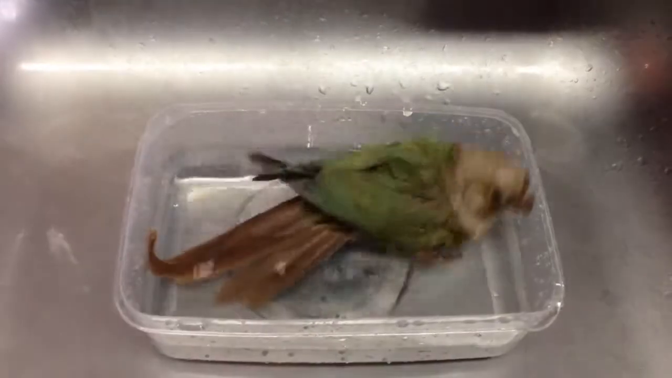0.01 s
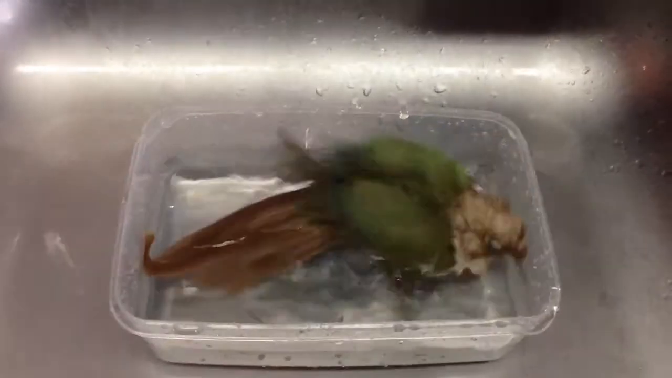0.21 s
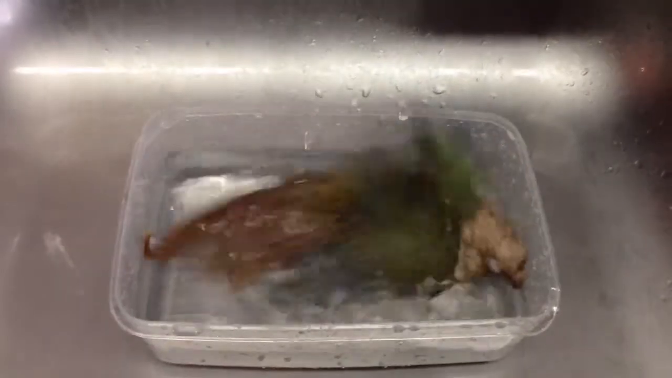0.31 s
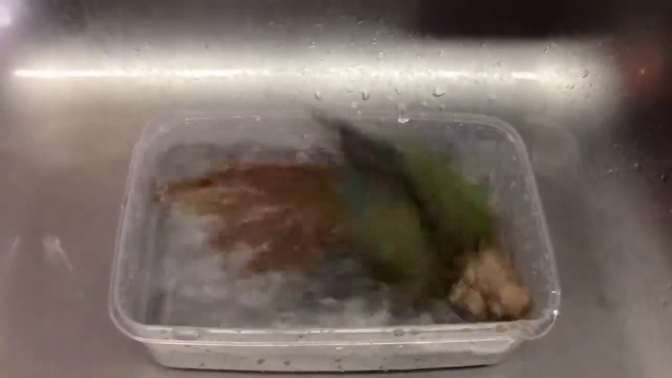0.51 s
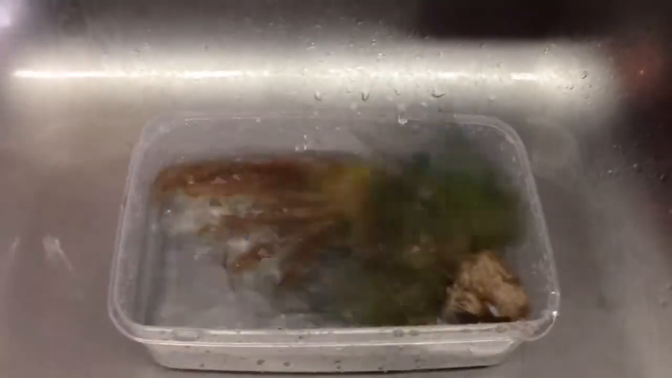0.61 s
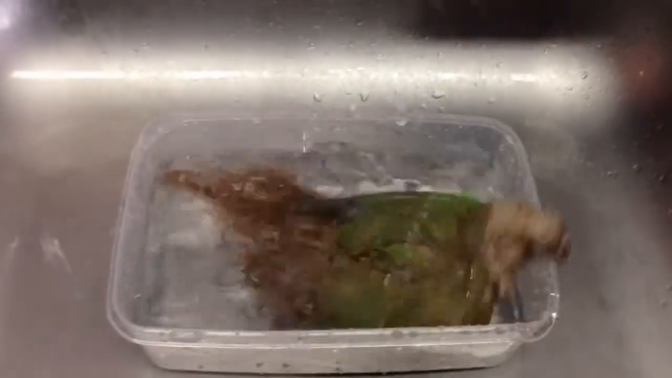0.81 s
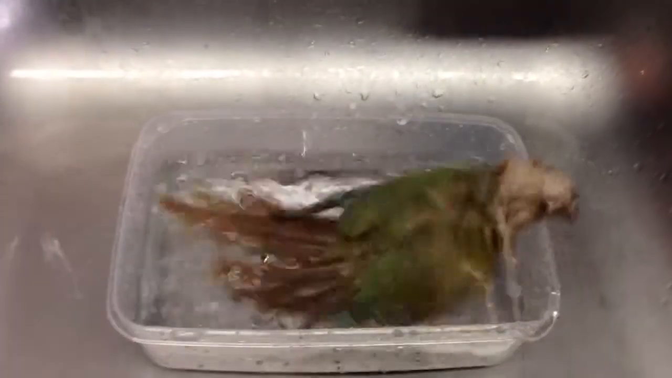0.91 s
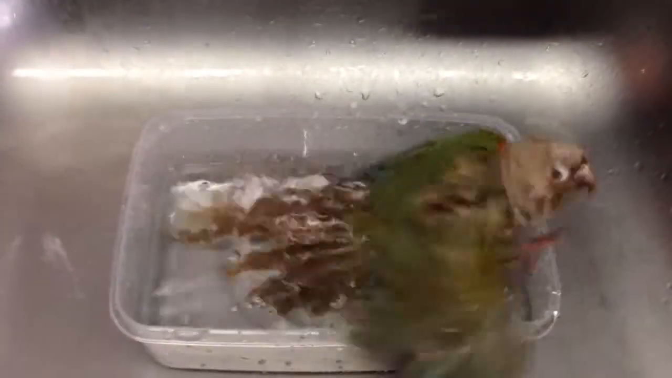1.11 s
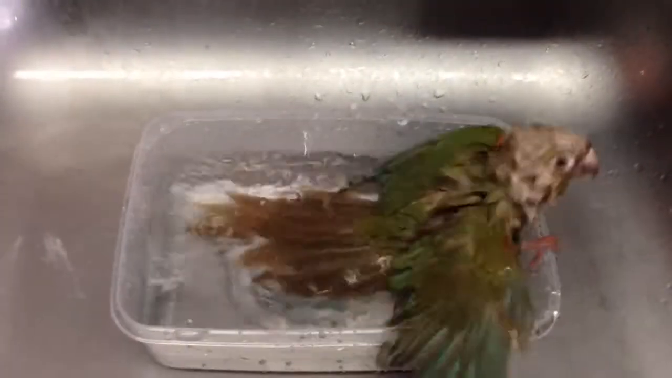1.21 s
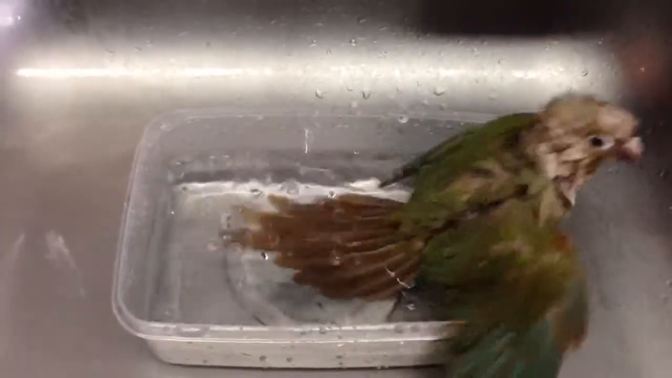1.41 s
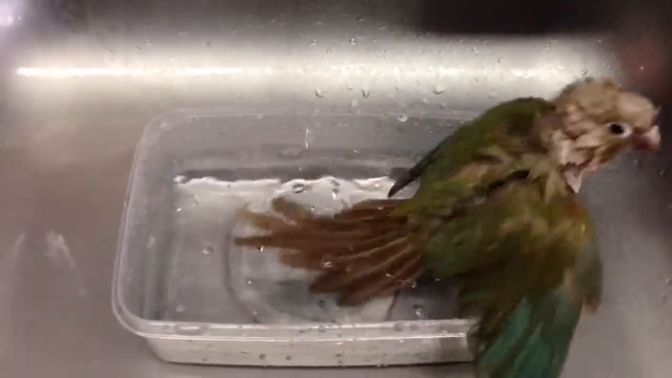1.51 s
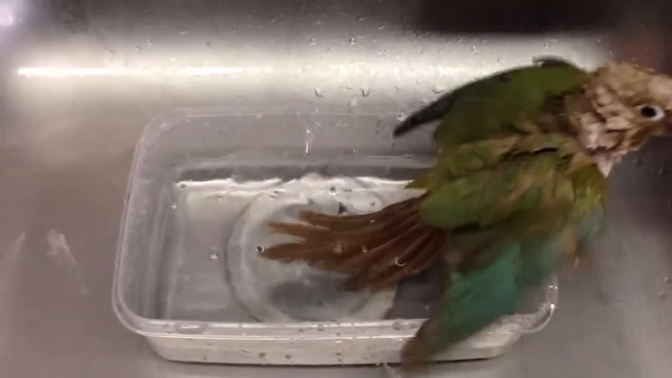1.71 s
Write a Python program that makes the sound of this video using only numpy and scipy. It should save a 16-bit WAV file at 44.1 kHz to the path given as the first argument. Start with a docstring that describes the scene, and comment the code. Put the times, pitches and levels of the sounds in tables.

```python
"""A small parrot bathes in a shallow plastic tub on a kitchen worktop, heard from close by.
Wet wings throw spray and slap the water, trapped air bubbles ring, the thin tub booms under the bird,
and a few drops tick on the plastic. Hard surfaces nearby add short reflections over a quiet room,
and a faint, very high whistle enters at the end."""
import sys
import numpy as np
from scipy import signal
from scipy.fft import rfft, irfft
from scipy.io import wavfile

SR = 44100
rng = np.random.default_rng(int(sys.argv[2]) if len(sys.argv) > 2 else 0)


def bounce(signal):
    """Save signal as a 16-bit WAV file at the path given by the first command-line argument."""
    frames = np.transpose(np.atleast_2d(signal))
    limited = np.clip(frames, -1, 1)
    pcm = np.round(limited * 32767).astype(np.int16)
    wavfile.write(sys.argv[1], SR, pcm)


N = 79380  # 1.8 s


def spray(droplet_db=3, crackle_db=-2, feather_db=-4):
    """Each wing stroke swells and fades with droplets, crackle and the swish of wet feathers."""
    # Wing strokes through the water. Each row: crest time, rise and fall in seconds, level in dB,
    # treble tilt in dB per octave.
    strokes = [(0.027, 0.0086, 0.0084, -50, 6.5), (0.199, 0.026, 0.03, -52, 2),
               (0.218, 0.0081, 0.022, -49, -2), (.316, 0.013, 0.011, -45.5, 1),
               (0.34, 0.0071, 0.018, -42.5, 2.5), (0.366, 0.0073, .013, -38.5, 1),
               (0.388, 0.0078, 0.021, -42.5, 1.5), (0.417, 0.0076, 0.017, -45.5, 1.5),
               (0.449, 0.02, 0.028, -42.5, 2), (0.5, 0.0099, 0.031, -46.5, 0.5),
               (.551, 0.021, 0.025, -43.5, 1.5), (.587, 0.022, 0.059, -53.5, 0),
               (0.666, 0.0035, 0.035, -46, 0.5), (0.694, 0.0066, 0.013, -28, -1.5),
               (0.73, 0.0082, 0.03, -34, -2), (0.777, 0.014, 0.042, -39.5, 2),
               (0.815, 0.028, 0.021, -42, 4.5), (0.839, 0.018, 0.021, -39.5, -2),
               (0.863, 0.0037, 0.029, -44.5, -1.5), (0.913, 0.0052, 0.028, -50, -1),
               (1.065, 0.014, 0.031, -53.5, 1), (1.135, 0.0053, 0.026, -49.5, 2.5),
               (1.171, 0.029, 0.032, -44.5, 1.05)]
    # Tone of the spray. Each row: frequency in Hz, gain in dB.
    spray_eq = [(45, -30), (140, 1.5), (200, -4), (260, 9), (430, 1), (1100, -4.5), (2000, -0.5),
                (4000, -1.5), (11000, -11.5), (15500, -19)]
    out, t = np.zeros(N), seconds(N)
    wet = undb(droplet_db) * droplets() + undb(crackle_db) * crackle()
    wet += undb(feather_db) * rng.standard_normal(N)
    for at, rise, fall, db, tilt in strokes:
        swell = np.exp(-np.maximum((at - t) / rise, (t - at) / fall))
        texture = np.roll(wet, rng.integers(N))  # a fresh stretch for every stroke
        out += undb(db) * swell * colour(texture, spray_eq, tilt)
    return out


def droplets(per_second=2400):
    """A dense patter of tiny drops and bubbles, each a few cycles long, a few far louder than the rest."""
    out, t = np.zeros(N), seconds(400)
    for when, pitch, rank, length in rng.random((int(per_second * N / SR), 4)):
        hz = 900 * 17 ** pitch
        decay_cycles = 3.25 * (0.18 + length)
        fade = np.exp(-t * hz / decay_cycles)
        gain = undb(-3.4 * np.log(rank + 0.0051)) * hz  # low ranks and high pitches stand out
        add(out, when * N / SR, gain * fade * np.sin(2 * np.pi * hz * t))
    return unit(out)


def crackle(per_second=810, spread_db=2):
    """Sharp specks of spray strike the tub."""
    struck = rng.random(N) < per_second / SR
    strength = undb(spread_db * np.minimum(rng.exponential(size=N), 3))
    polarity = np.sign(rng.standard_normal(N))
    return unit(struck * strength * polarity)


def slaps():
    """Sharp bursts of noise, each with its own pitch, width and decay."""
    # A faint ring near 1 kHz fades away at the start; the other rows are sharp slaps on the water.
    # Each row: start in seconds, level in dB, centre in Hz, half-width in octaves, decay in seconds.
    bursts = [(.001, -58, 1000, .4, 0.037), (.2088, -38, 1160, 0.7, 0.0047),
              (0.2135, -34, 2490, 0.88, 0.0044), (0.3126, -29, 2500, 0.87, 0.0017),
              (0.3374, -35, 590, 0.57, 0.0037), (0.4973, -34, 2620, 0.69, 0.0034),
              (0.5801, -37.5, 3210, 0.19, 0.0067), (.6900, -32, 2230, 1.5, 0.0056),
              (0.6929, -29.5, 870, 0.4, 0.005), (0.6945, -22, 4000, 1.04, 0.0026),
              (0.726, -22, 3550, 3.1, 0.00071), (0.7707, -28.5, 1090, 0.84, 0.0016),
              (0.7748, -30.5, 3700, 0.21, 0.0039), (0.7816, -28.5, 2540, 0.16, 0.0049),
              (.8120, -34.5, 666, 1.1, 0.009), (0.8603, -31, 4150, 0.27, 0.0019),
              (0.9028, -39.5, 3300, 0.55, 0.006), (0.926, -43.5, 4860, 0.44, 0.0027),
              (1.1895, -32.5, 2580, 1.4, 0.0024)]
    out, t = np.zeros(N), seconds(4096)
    for at, db, centre, width, decay in bursts:
        fade = np.exp(-t / decay)
        burst = np.pad(rng.standard_normal(len(t)) * fade, len(t))  # space for the filter to ring
        burst = shape(burst, lambda hz: band_pass(np.log2(hz / centre), width))
        makeup_gain = np.sqrt(np.sum(fade ** 2) / np.sum(burst ** 2))
        add(out, at - len(t) / SR, undb(db) * burst * makeup_gain)
    return out


def bubbles(attack_s=0.00031, rise_per_s=2.7):
    """Trapped air rings briefly and rises in pitch; faint strays die away as the water settles."""
    # Distinct air bubbles. Each row: start in seconds, pitch in Hz, level in dB, decay in seconds.
    plinks = [(.2168, 2240, -20, 0.0012), (0.3122, 3880, -25, 0.002), (.3368, 690, -36, 0.0019),
              (.3385, 472, -36.5, .006), (.3645, 2180, -37, 0.0028), (.3852, 2840, -38, .003),
              (.413, 5730, -28.5, 0.0019), (0.4499, 2440, -30, 0.0024), (.4985, 3740, -22, 0.00098),
              (0.5341, 3150, -36.5, 0.0034), (0.539, 1910, -31.5, 0.0033), (.5495, 4820, -27.5, 0.0015),
              (0.5854, 2033, -31.5, 0.003), (0.619, 2530, -43.5, 0.0045), (.641, 1860, -33, 0.0018),
              (0.6901, 3640, -14.5, 0.0012), (0.6905, 1475, -28, 0.009), (0.7725, 3430, -18.5, 0.0014),
              (0.7797, 3390, -20, 0.0013), (.7845, 2030, -24, 0.001), (0.8196, 4230, -24.5, 0.0013),
              (0.833, 8680, -32, 0.0021), (.841, 2000, -29.5, 0.0024), (.9035, 3627, -34.5, 0.0077),
              (1.037, 3180, -50, 0.0076), (1.121, 1787, -47.5, 0.017), (1.1908, 1785, -37, 0.005),
              (1.2688, 5890, -48, 0.0019), (1.3455, 3980, -55.5, .005)]
    strays = [(0.6 + delay, 2910 * 2 ** (2 * pitch - 1), -48 - 26 * delay, 0.0016)
              for delay, pitch in rng.random((24, 2))]
    out, t = np.zeros(N), seconds(3000)
    for at, hz, db, decay in plinks + strays:
        phase = 2 * np.pi * hz * (t + rise_per_s * t ** 2 / 2)
        envelope = (1 - np.exp(-t / attack_s)) * np.exp(-t / decay)
        add(out, at, undb(db) * envelope * np.sin(phase))
    return out


def tub(attack_s=0.0082, lowest_t60_s=0.096):
    """Soft shoves boom the tub: its lowest mode shifts with the bird's weight, the walls hold pitch."""
    # Shoves against the tub. Each row: start in seconds, level in dB, lowest mode in Hz.
    shoves = [(.213, -45.5, 261.6), (0.313, -40.5, 255), (.352, -43.5, 262), (.697, -23, 253.3),
              (.730, -34.5, 248), (.756, -32.5, 253), (0.813, -41, 238.6), (0.844, -36.5, 268.4),
              (1.205, -44.5, 258), (1.519, -43, 266.5), (1.632, -49.5, 278)]
    # Higher modes of the water-filled tub. Each row: pitch in Hz, dB against the lowest, T60 in seconds.
    wall_modes = [(284, -11.5, 0.045), (360, -10.5, 0.089), (589, -18, 0.11), (711.5, -11, 0.054),
                  (966, -18, 0.078)]
    out, t = np.zeros(N), seconds(12000)
    soft_onset = 1 - np.exp(-(t / attack_s) ** 2)
    for at, db, pitch in shoves:
        boom = ring([(pitch, 0, lowest_t60_s)] + wall_modes, t) * soft_onset
        add(out, at, undb(db) * boom / np.abs(boom).max())
    return shape(out, lambda hz: low_cut(hz, 227, order=10))  # the tub gives off no deep bass


def drips(click_db=6, click_decay_s=0.0014, low_hz=780, high_hz=9800):
    """Single drops tick on the plastic, which rings for a moment."""
    # Falling drops. Each row: start in seconds, peak in dB, treble tilt in dB per octave.
    drops = [(1.4925, -37, 3), (1.5432, -40.5, 1.5), (1.5805, -33, -5), (1.6299, -33.5, -5)]
    # Ring of the plastic. Each row: pitch in Hz, level in dB, T60 in seconds.
    plastic_modes = [(757, -9.5, 0.019), (1545, -6.5, 0.026), (2330, 7.5, 0.0036), (3480, 0.5, 0.0076)]
    tilt_corner_hz = plastic_modes[1][0]
    out, t = np.zeros(N), seconds(4096)
    for at, db, tilt in drops:
        click = undb(click_db) * np.exp(-t / click_decay_s) * rng.standard_normal(len(t))
        tick = np.pad(ring(plastic_modes, t) + click, len(t))
        tick = shape(tick, lambda hz: tilt * np.log2(1 + hz / tilt_corner_hz)
                     + low_cut(hz, low_hz) + low_cut(high_hz, hz))  # swapped arguments cut the highs
        add(out, at - len(t) / SR, undb(db) * tick / np.abs(tick).max())
    return out


def kitchen(x, early_db=-7, early_s=0.0085, tail_db=-21, tail_t60_s=0.3):
    """Quick reflections from the tub and worktop, then a short room tail, both thin in the bass."""
    t = seconds(20000)
    early = rng.standard_normal(len(t)) * np.exp(-t / early_s) * (t > 0.001)
    tail = rng.standard_normal(len(t)) * np.exp(-np.log(1000) * t / tail_t60_s) * (t > early_s)
    response = (undb(early_db) * unit(early) + undb(tail_db) * unit(tail)) / np.sqrt(len(t))
    reflections = shape(signal.fftconvolve(x, response), lambda hz: low_cut(hz, 420))
    return x + reflections[:N]


def whistle(start_s=1.67, pitch_hz=12640, half_width_hz=80, level_db=-70):
    """A faint, very high whistle: a narrow band of noise that flickers."""
    band = shape(rng.standard_normal(N), lambda hz: band_pass(hz - pitch_hz, half_width_hz))
    return (seconds(N) > start_s) * undb(level_db) * unit(band)


def room_tone(level_db=-62):
    """The steady hush of the kitchen, fullest in the low mids."""
    # Tone of the quiet room. Each row: frequency in Hz, gain in dB.
    room_eq = [(70, -23), (130, 2), (190, -5.5), (290, 5.5), (500, -3.5), (1000, -7.5), (2200, -10.5),
               (4000, -7), (6500, -10.5), (15500, -14.5)]
    return undb(level_db) * colour(rng.standard_normal(N), room_eq)


def undb(db):
    """Decibels to gain."""
    return 10 ** (np.asarray(db) / 20)


def unit(x):
    """Scale to rms 1."""
    return x / np.sqrt(np.mean(x ** 2) + 1e-20)


def seconds(samples):
    """Time axis in seconds."""
    return np.arange(samples) / SR


def add(out, at, x):
    """Mix a sound in at a time in seconds."""
    i = int(at * SR)
    x, i = x[max(-i, 0):], max(i, 0)
    out[i:i + len(x)] += x[:max(len(out) - i, 0)]


def ring(modes, t):
    """Sum of decaying modes."""
    return sum(undb(db - 60 * t / t60) * np.sin(2 * np.pi * hz * t) for hz, db, t60 in modes)


def shape(x, db_at):
    """Filter by a gain in dB that is a function of frequency."""
    hz = np.maximum(np.fft.rfftfreq(len(x), 1 / SR), 1)
    return irfft(rfft(x) * undb(db_at(hz)), len(x))


def colour(x, points, tilt=0):
    """Equalise through (Hz, dB) points, tilted in dB per octave above 1 kHz; rms 1."""
    point_hz, point_db = np.array(points, float).T
    return unit(shape(x, lambda hz: np.interp(np.log(hz), np.log(point_hz), point_db)
                      + tilt * np.log2(np.clip(hz / 1000, 1, 16))))


def low_cut(hz, corner_hz, order=2):
    """Gain in dB of a high-pass."""
    return -10 * np.log10(1 + (corner_hz / hz) ** (2 * order))


def band_pass(offset, half_width):
    """Gain in dB of a band-pass at an offset from its centre."""
    return -10 * np.log10(1 + (offset / half_width) ** 4)


def scene():
    """The bath in the kitchen over faint room noise, in mono."""
    hush = room_tone()
    bath = slaps() + bubbles() + tub() + drips() + spray()
    return (kitchen(bath) + whistle() + hush)[None]


def record(dry):
    """A steep low-pass at 15450 Hz takes off the very top."""
    return signal.sosfilt(signal.ellip(10, 0.2, 70, 15450, fs=SR, output="sos"), dry)


dry = scene()
out = record(dry)
bounce(out)
```